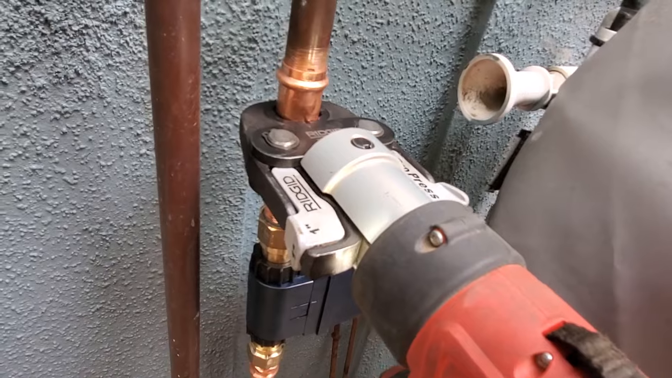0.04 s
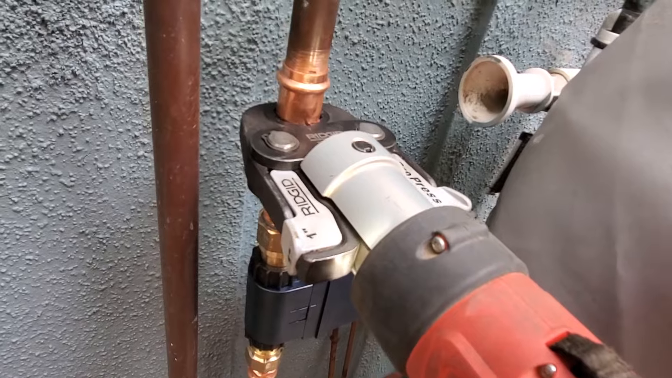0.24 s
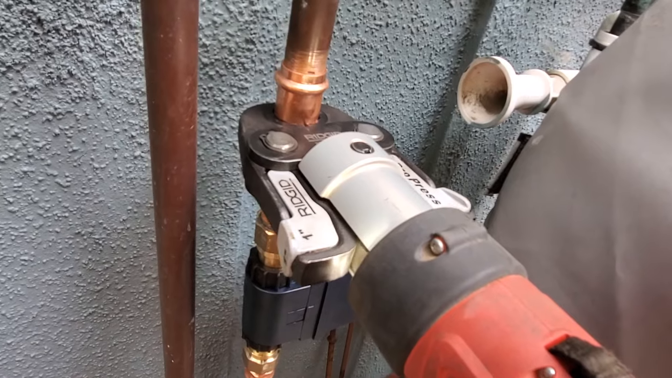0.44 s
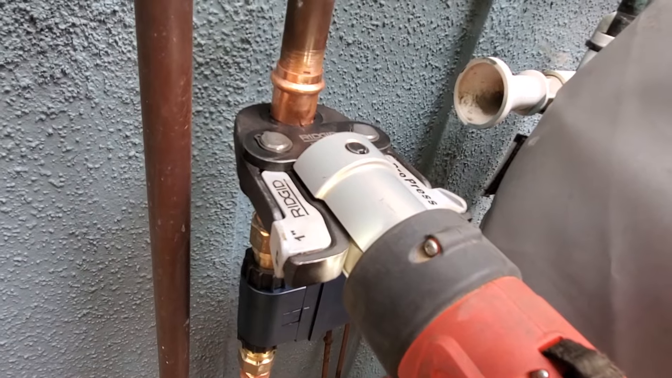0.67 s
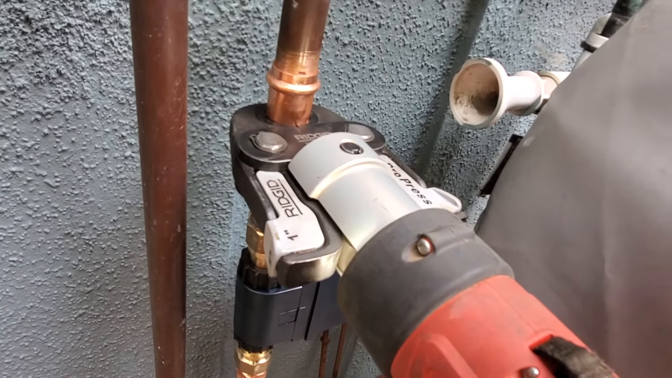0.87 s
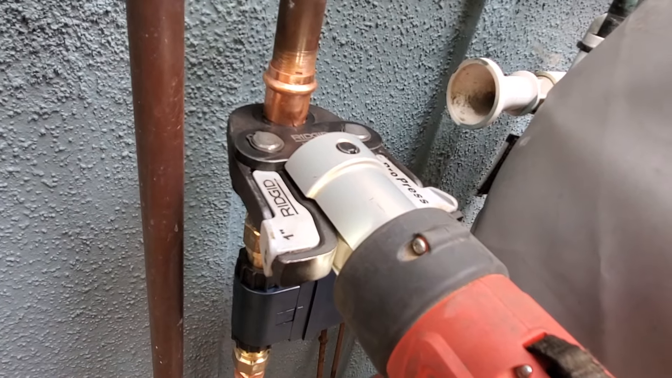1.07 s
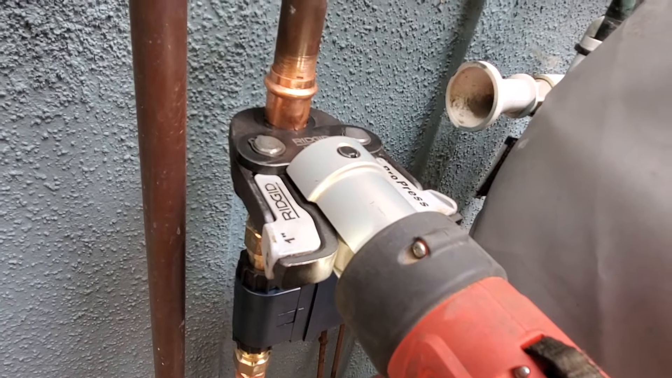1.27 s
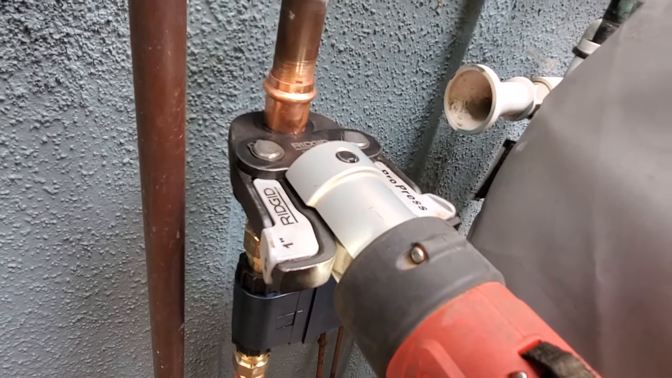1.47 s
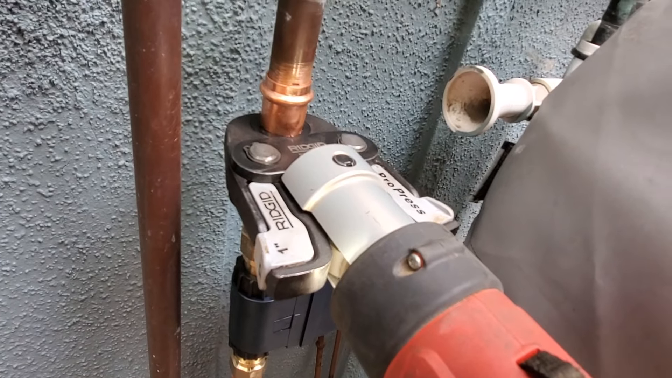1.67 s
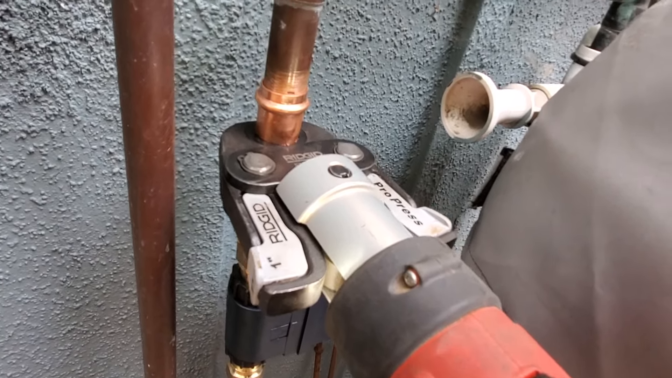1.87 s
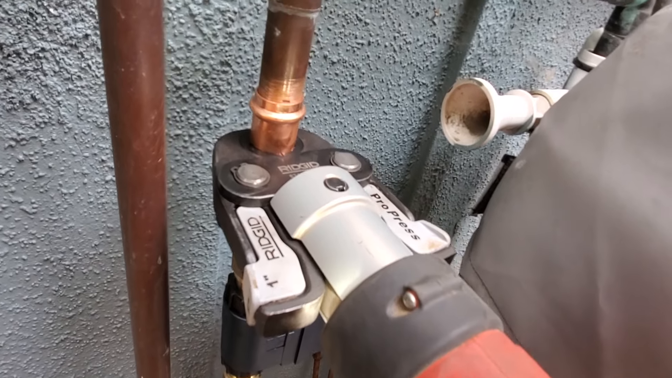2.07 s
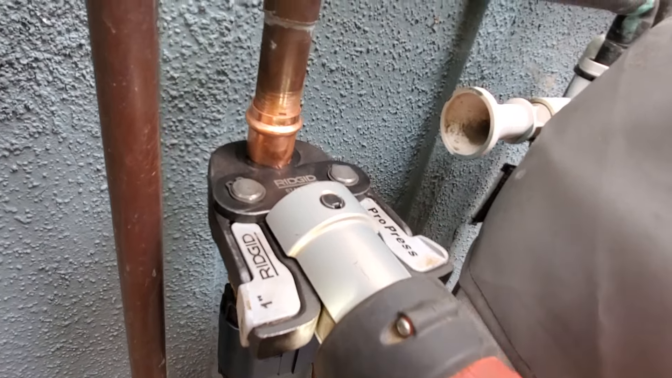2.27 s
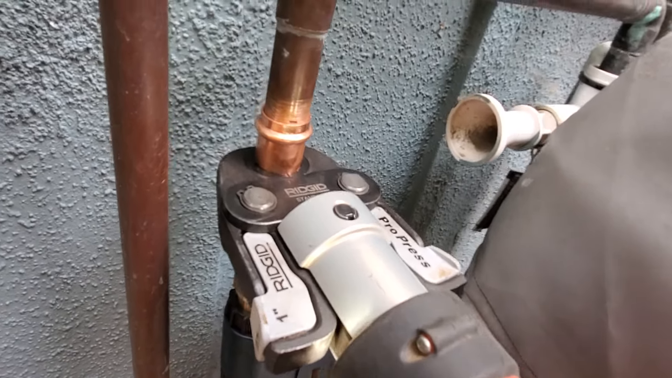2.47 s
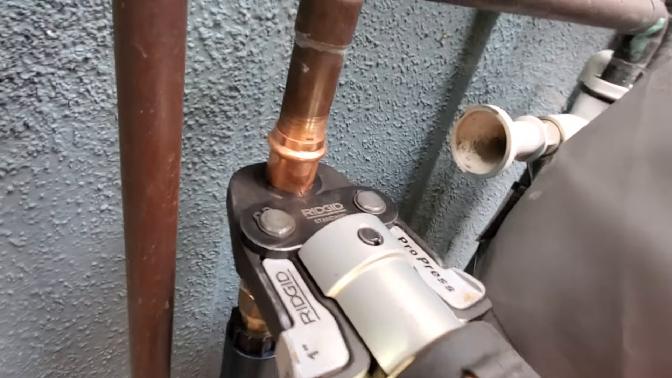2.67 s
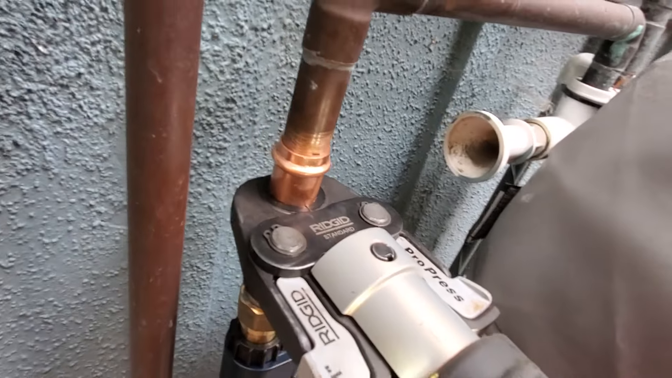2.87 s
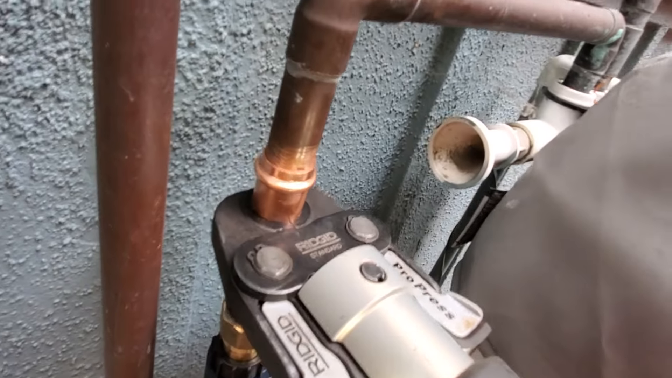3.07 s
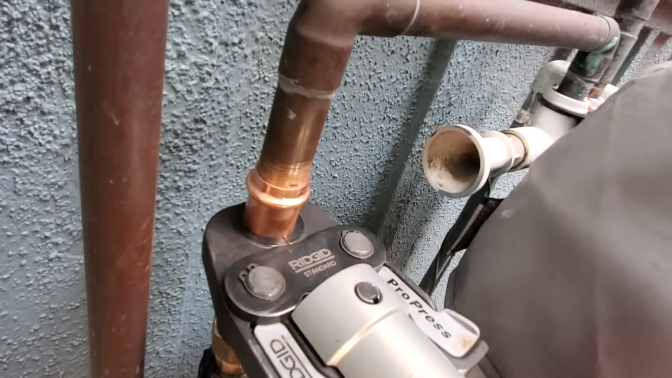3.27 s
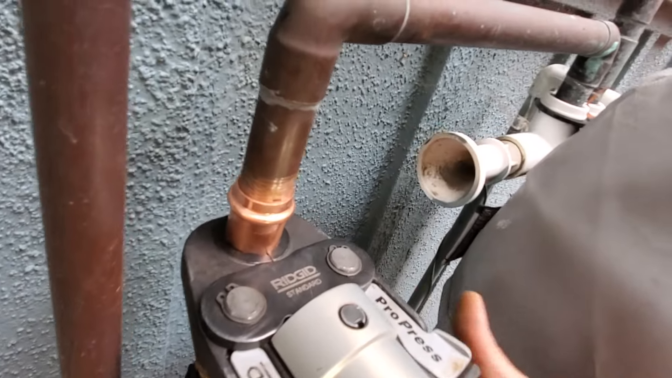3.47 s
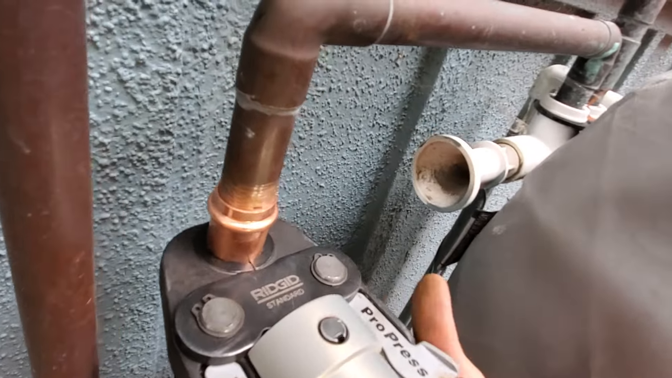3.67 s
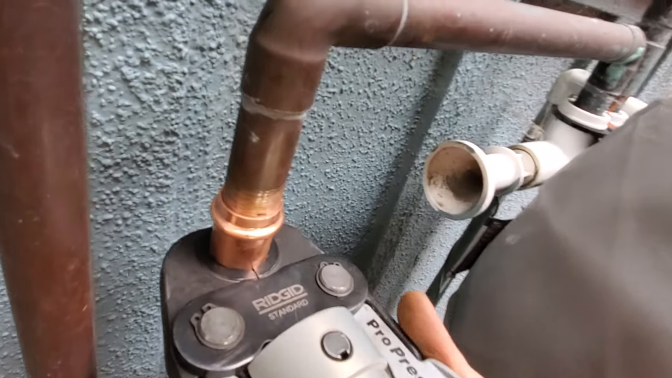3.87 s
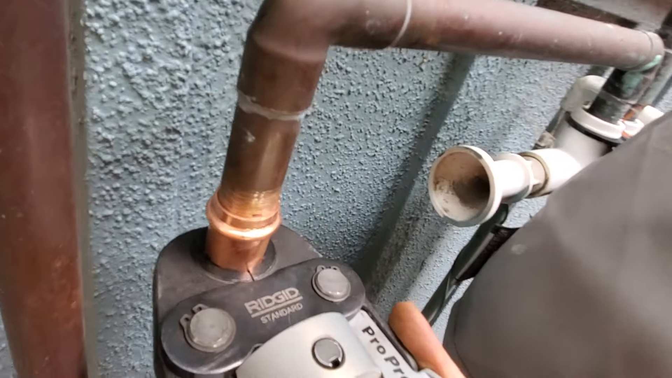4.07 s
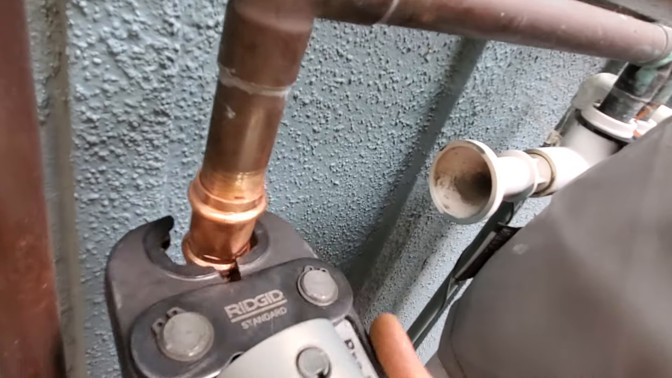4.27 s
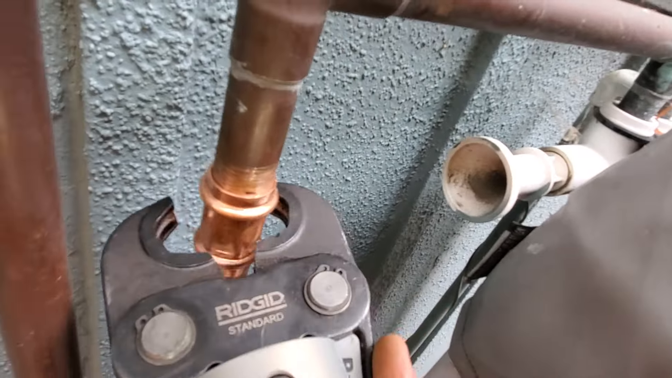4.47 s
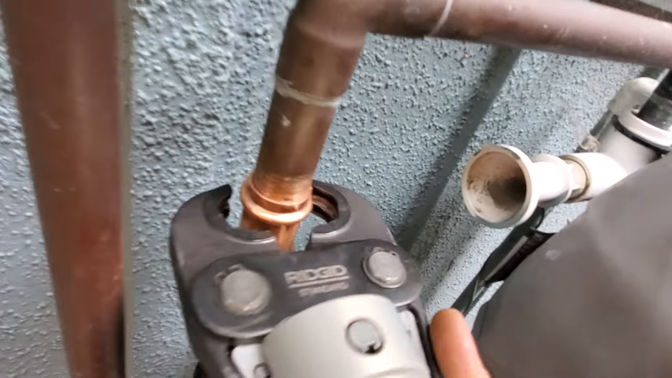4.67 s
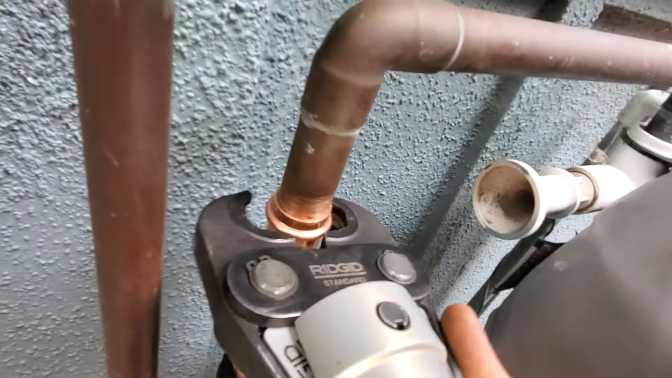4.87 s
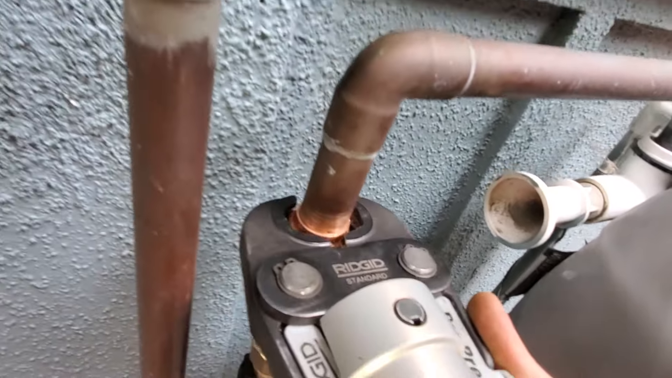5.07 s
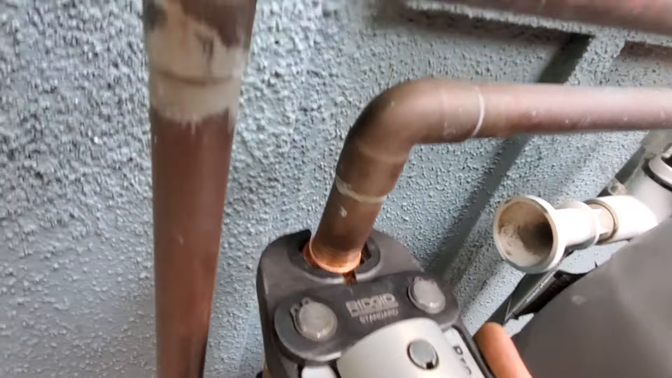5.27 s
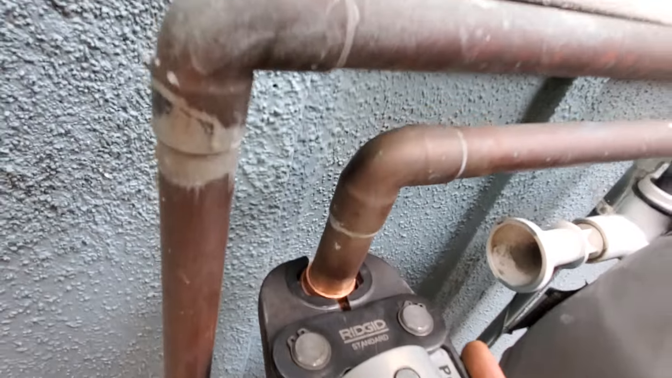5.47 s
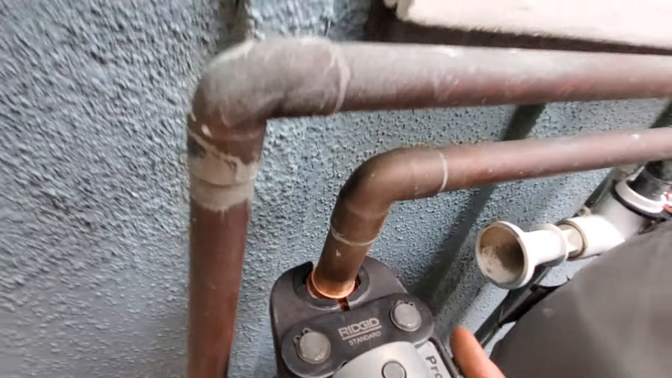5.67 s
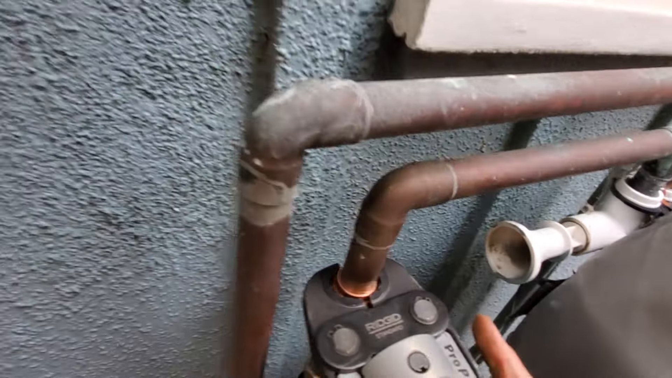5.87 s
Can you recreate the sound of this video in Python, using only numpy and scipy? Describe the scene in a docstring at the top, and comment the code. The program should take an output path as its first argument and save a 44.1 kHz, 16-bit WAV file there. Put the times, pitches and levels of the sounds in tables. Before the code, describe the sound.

A battery press tool whines and rattles close by, labours lower and rougher, pops and stops, then its steel jaws clank open and knock on copper pipe.

```python
"""A motor's whine and gear rattle come first: a battery press tool crimps a copper fitting near the microphones.
The place is a corner between hard walls; a distant machine drones in the building.
The motor drives a piston pump through a 6:1 gear and labours under load until the relief valve pops and it stops.
Then oil whistles back, a hand shifts on the tool, and the sprung steel jaws snap open and knock on the pipe.
Tones and impacts are sums of sines or ringing resonances; hiss, rub and rattle are shaped noise."""
import sys
import numpy as np
from scipy import signal
from scipy.fft import rfft, irfft, next_fast_len
from scipy.io import wavfile
from scipy.ndimage import map_coordinates

SR = 44100
rng = np.random.default_rng(int(sys.argv[2]) if len(sys.argv) > 2 else 0)


def file_out(sig):
    """Save sig as 16-bit WAV at sys.argv[1]."""
    # one column per channel
    cols = np.atleast_2d(sig).T
    # limit, then scale
    lim = np.clip(cols, -1, 1)
    pcm = np.round(lim * 32767).astype(np.int16)
    wavfile.write(sys.argv[1], SR, pcm)


N = 261072
TIME = np.arange(N) / SR


def amp(db):
    """Decibels to gain."""
    return 10 ** (np.asarray(db) / 20)


def unit(x):
    """Scale to rms 1."""
    return x / np.sqrt(np.mean(x ** 2) + 1e-20)


def along(points, hz):
    """Read (frequency, value) points on a log frequency axis."""
    f, v = np.transpose(points)
    return np.interp(np.log(hz + 1), np.log(f + 1), v)


def curves(rows):
    """One value per sample for each column after the time."""
    s, *cols = np.transpose(rows)
    return [np.interp(TIME, s, c) for c in cols]


def wobble(rate):
    """A random curve with rate knots a second."""
    knots = rng.standard_normal(int(N * rate / SR) + 4)
    return map_coordinates(knots, [TIME * rate])


def filtered(x, response):
    """x times a complex response of frequency."""
    n = x.shape[-1]
    m = next_fast_len(n + SR // 2)
    return irfft(rfft(x, m) * response(np.fft.rfftfreq(m, 1 / SR)), m)[..., :n]


def coloured(x, spectrum):
    """x shaped by a spectrum, at rms 1."""
    return unit(filtered(x, lambda hz: amp(along(spectrum, hz))))


def resonate(x, modes):
    """x through a body's resonances, side by side with alternating sign."""
    def body(f):
        total = 0
        for k, (centre, width, db) in enumerate(modes):
            damping = 1j * f * width
            total = total + (-1) ** k * amp(db) * damping / (centre * centre - f * f + damping)
        return total
    return filtered(x, body)


def noise(width, size=N):
    """White stereo noise; width is side over mid."""
    mid, side = rng.standard_normal((2, size))
    return unit(np.array([mid + width * side, mid - width * side]))


def pan(side_db):
    """Left and right gains that differ by side_db."""
    return amp(np.array([[.5], [-.5]]) * side_db)


def fade(start, t60):
    """A sudden start and an exponential decay."""
    return (TIME >= start) * np.exp(-np.log(1000) * np.maximum(TIME - start, 0) / t60)


def swell(middle, half):
    """A smooth rise and fall around a moment."""
    return np.exp(-((TIME - middle) / half) ** 2)


def held(start, length, rise, t60):
    """Exponential attack over 60 dB in rise seconds, hold, and exponential release."""
    attack = np.maximum(start - TIME, 0) / rise
    release = np.maximum(TIME - start - length, 0) / t60
    return np.exp(-np.log(1000) * (attack + release))


def add(track, s, sound):
    """Mix a short sound in at time s."""
    part = track[:, round(s * SR):][:, :sound.shape[-1]]
    part += sound[..., :part.shape[-1]]


# Hard walls close to the tool: (frequency [Hz], t60 [s])
WALLS = [(100, 0.38), (500, .35), (2500, 0.3), (6000, 0.27), (14000, 0.076)]


def room(x, wet_db):
    """x and the answer of the near walls, each frequency dying at its own speed."""
    hz, t, z = signal.stft(rng.standard_normal((2, SR // 2)), SR, nperseg=256)
    decay = np.exp(-np.log(1000) * t / along(WALLS, hz)[:, None])
    tail = signal.istft(z * decay, SR, nperseg=256)[1]
    tail = np.pad(tail / np.linalg.norm(tail[0]), ((0, 0), (SR // 300, 0)))  # first echo after 1/300 s
    return x + amp(wet_db) * signal.fftconvolve(x, tail, axes=1)[:, :N]


# A distant machine heard through the building: (frequency [Hz], width [Hz], level [dB])
DRONE = [(44, 5.7, 0)]


def drone():
    """Twice-resonated noise wavers low, a little stronger as the microphone moves along the wall."""
    level_db = np.interp(TIME, [2.8, 3.6], [-55, -45])
    return amp(level_db) * unit(resonate(resonate(noise(width=0.17), DRONE), DRONE))


# Rumble in the microphone's body: (frequency [Hz], relative level [dB])
RUMBLE = [(20, -18.5), (33, -12), (48, 3), (65, 7), (105, 3.5), (150, -2.5), (250, -8), (500, -48)]
# Sleeve rustle: (frequency [Hz], relative level [dB])
RUSTLE = [(100, -16), (200, -7.5), (300, -5.5), (460, -9.5), (750, -7), (1200, -13.5), (1900, -16.5),
          (3000, -28), (6000, -46.5), (12000, -65.5)]
# Palm sliding on the casing: (frequency [Hz], relative level [dB])
RUB = [(1500, -21), (3500, 1.5), (6000, 1), (9500, -2.5), (12000, 3), (16000, -6)]
# Palm squeak on the casing: (frequency [Hz], relative level [dB])
SQUEAK = [(5800, -4), (7500, 2), (11000, 0), (12000, -3), (14000, -6.5), (15400, 1)]
# Moves of the hand on the tool:
# (middle time [s], palm half length [s], rumble level [dB], sleeve level [dB], palm level [dB])
HAND_MOVES = [(2.119, 0.071, -47, -62, -73), (3.237, 0.063, -41.5, -53.5, -63.5),
              (3.637, 0.084, -44.5, -52.5, -62), (3.899, 0.13, -42.5, -48, -76),
              (4.23, 0.079, -36.5, -45, -51.5), (4.484, 0.12, -38.5, -51, -54),
              (5.049, 0.15, -40, -49, -61), (5.37, 0.07, -44, -45.5, -58), (5.69, 0.24, -43, -49.5, -55.5),
              (5.92, 0.048, -41, -49.5, -68)]
ARM_LINGER = 2.11  # the arm moves this many times as long as the palm slides
REST_RUMBLE_DB, REST_RUSTLE_DB, REST_HISS_DB = -51.5, -56.5, -89  # while the hand is still


def handling():
    """Hand moves rumble in the microphone's body, rustle a sleeve and slide the palm, which squeaks once."""
    rumbling, rustling, sliding = amp(REST_RUMBLE_DB), amp(REST_RUSTLE_DB), amp(REST_HISS_DB)
    for s, half, rumble_db, sleeve_db, palm_db in HAND_MOVES:
        arm = swell(s, ARM_LINGER * half)
        rumbling = np.hypot(rumbling, amp(rumble_db) * arm)
        rustling = np.hypot(rustling, amp(sleeve_db) * arm)
        sliding = np.hypot(sliding, amp(palm_db) * swell(s, half))
    rumble = rumbling * coloured(noise(width=0.11), RUMBLE)
    rustle = rustling * amp(0.83 * wobble(14)) * coloured(noise(width=0.85), RUSTLE)
    rub = sliding * amp(1.2 * wobble(53)) * coloured(noise(width=1.0), RUB)
    squeak_modes = [(hz, 130, db) for hz, db in SQUEAK]  # each 130 Hz wide
    squeak = unit(resonate(noise(width=0.93), squeak_modes))
    squeak = amp(-63.0) * squeak * held(2.99, length=0.033, rise=.015, t60=.3)
    return (rumble + rustle + rub + squeak) * pan(-1.7)


# Oil whistling and hissing back through the valve as the ram retracts: (middle time [s], half length [s],
# level [dB], pitch at the middle [Hz], glide [octaves/s], flutter rate [knots/s])
WHISTLES = [(2.3, .2, -75.5, 6500, -1.2, 5500), (2.46, .06, -80.5, 10500, -1.0, 300),
            (2.48, .03, -75, 11900, -1.8, 300), (2.62, .035, -66, 4500, -1.5, 400),
            (2.63, 0.1, -70, 4800, -1.5, 1990), (2.698, 0.14, -70.5, 3510, -0.5, 450)]


def oil_return():
    """Thin whistles, broadened by random flutter, sink in pitch as the pressure drains."""
    out = np.zeros((2, N))
    for s, half, db, hz, glide, flutter_rate in WHISTLES:
        pitch = hz * 2 ** (glide * (TIME - s))
        tone = np.sin(2 * np.pi * np.cumsum(pitch) / SR)
        whistle = tone * np.array([wobble(flutter_rate), wobble(flutter_rate)])
        out += amp(db) * swell(s, half) * unit(whistle)
    return out


# The copper pipe's resonances: (frequency [Hz], width [Hz], level [dB])
COPPER = [(748, 220, -2), (1597, 230, -4.5), (2466, 150, 2), (3740, 580, -13.5), (4600, 550, -14),
          (7200, 900, -26)]
# The open jaws scraping along the copper: (start time [s], length [s], level [dB], t60 [s])
SCRAPES = [(4.34, 0.03, -42.5, .03), (4.953, .005, -40, .03), (5.336, 0.17, -47, 0.97)]
SCRAPE_RISE_S = 0.058  # for a rise of 60 dB


def scrape():
    """Steel slips over the pipe in small uneven catches: wavering noise excites the copper."""
    grit = noise(width=0.99) * amp(1.6 * wobble(250))
    pressure = sum(amp(db) * held(s, length, SCRAPE_RISE_S, t60) for s, length, db, t60 in SCRAPES)
    return pressure * unit(resonate(grit, COPPER))


# The ram clicking as it unloads and draws back: (time [s], blow strength [dB])
RAM_CLICKS = [(2.038, 9.5), (2.2344, -1.5), (2.238, -4)]
# The ram and its rollers: (frequency [Hz], width [Hz], level [dB])
RAM = [(1038, 45, 2), (1640, 82, -3.5), (2700, 160, -6), (3260, 120, -9), (4100, 200, -15.5)]


def ram():
    """The steel ram gives short, hollow clicks as the pressure leaves it."""
    blows = np.zeros((2, N))
    for s, db in RAM_CLICKS:
        add(blows, s, amp([db]))
    return room(resonate(blows, RAM), wet_db=-10.5)


# The jaw spring's resonances: (frequency [Hz], width [Hz], level [dB])
COIL = [(1840, 260, -9), (2600, 500, -9), (6530, 130, 3), (7900, 350, -6.5), (12800, 550, -7)]
SPRING_S, SPRING_DB, SPRING_HOLD_S, SPRING_T60_S = 4.383, -25, 0.028, 0.26


def spring():
    """The jaw spring buzzes against the steel as the jaws let go of the fitting."""
    chatter = unit(resonate(noise(width=0.89), COIL))
    shape = held(SPRING_S, SPRING_HOLD_S, rise=.015, t60=SPRING_T60_S)
    return amp(SPRING_DB + 1.4 * wobble(380)) * chatter * shape


def burst(spectrum, width, t60):
    """Coloured noise that starts at once and dies away."""
    t = TIME[:SR // 2]
    return coloured(noise(width, size=len(t)), spectrum) * np.exp(-np.log(1000) * t / t60)


def struck(modes, scatter_db, detune):
    """One blow on a body's modes; grip and point of contact shift their levels and pitches every time."""
    t = TIME[:SR // 2]
    out = 0
    for k, (hz, db, t60) in enumerate(modes):
        level_db = db + rng.normal(0, scatter_db) + rng.normal(0, 1, (2, 1))
        pitch = hz * (1 + detune * rng.normal())
        out = out + amp(level_db - 60 * t / t60) * np.sin(2 * np.pi * pitch * t) * (-1) ** k
    return out


# Contacts of ram, jaws and pipe, with levels before the trims in knocks(): (time [s], pipe thud [dB],
# clack [dB], jaw plate knock [dB], tick [dB], treble slope [dB/octave], left over right [dB],
# steel ring [dB], frequency around which the jaws ring [Hz])
KNOCKS = [(2.234, -56, -42, -56, -51, -7, -3, -68, 2400),
          (2.531, -49, -48.5, -51, -55.5, -3, -9, -74.5, 3800),
          (4.134, -39.5, -31.5, -37, -45, 1, -3, -69, 3800),
          (4.140, -51.5, -53, -55, -40.5, 6, -2, -71, 13000),
          (4.342, -39.5, -34.5, -40, -45, -6, -4, -74.5, 2400),
          (4.363, -42, -30, -40, -42, -4, -1.5, -75, 2410),
          (4.3754, -47, -16, -6.5, -13, 0.5, 0, -46, 7000),
          (4.400, -26.5, -30, -40, -23, -1, -1, -52, 6600),
          (4.5437, -31, -19, -16, -17, -8, -2.5, -49.5, 4170),
          (4.783, -41, -38.5, -51, -56, -9, -2.5, -74, 3000),
          (4.875, -37.5, -46, -51, -59, -6, -3, -76, 3000),
          (4.957, -24, -16.5, -10.5, -28, -4, -2, -41.5, 2450),
          (4.973, -29, -24, -22, -29, -3, -5, -52, 6300),
          (5.139, -27.5, -23, -30, -31, -5.5, -4.5, -53, 8500),
          (5.148, -36, -30, -42, -40.5, -5, -3, -62, 3000), (5.27, -35, -30.5, -34, -45, -6, -2, -57, 2400),
          (5.304, -35.5, -30, -36, -46, 0, -5, -60, 2400), (5.341, -43.5, -44, -44, -54, -5, -6, -56, 2400)]
# Dull crack of a contact: (frequency [Hz], relative level [dB])
CLACK = [(200, -16), (700, -1), (1100, -5), (1650, -0.5), (2050, -9), (2500, -5.5), (3500, -11),
         (5000, -17), (9000, -31.5)]
# Bright tick of a contact: (frequency [Hz], relative level [dB])
TICK = [(1000, -31.5), (3500, -11), (5500, -5.5), (6700, 4.5), (7400, -5.5), (8200, 0), (9700, -14),
        (11500, -11.5), (13000, 2.5), (14200, -16.5), (16000, -16)]
# Jaw plates hit squarely, before scatter: (frequency [Hz], level [dB], t60 [s])
PLATES = [(1608.7, -0.5, 0.027), (1835, -2.5, 0.017), (2394, -6.5, 0.022), (2810, -9, .018),
          (3510, -6, .018), (4630, -8, 0.0084)]
# Ringing steel jaws, before scatter: (frequency [Hz], level [dB], t60 [s])
STEEL = [(2366, -3, 0.66), (2966, -4, 0.8), (3811, 3.5, 0.46), (5932, -17, .7), (6200, -12, 0.49),
         (6460, -6.5, .35), (7300, -6.5, .45), (8040, -9, 0.43), (12490, -15, 0.2), (13720, -5.5, .16)]
# Bending modes of the pipe run, before scatter: (frequency [Hz], level [dB], t60 [s])
PIPE = [(106.5, -7.5, .45), (148.1, -5, 0.42), (191, -1, 0.35), (226, -1.5, 0.28), (262, -3.5, 0.24),
        (333, -4, 0.14), (425, -3, .15), (501, -3, 0.14), (728, -6, 0.12), (1050, -11, 0.082)]
# The pipe rattling in its brackets: (frequency [Hz], relative level [dB])
BRACKETS = [(60, -12.5), (190, 1), (450, 1), (700, -7.5), (1500, -14), (4000, -42)]
DULL_HZ = 6650  # the treble slope starts here: a softer contact loses treble above this


def knocks():
    """Contacts crack, knock the jaw plates, ring the steel and send a bending wave down the pipe."""
    cracks, thuds, t = np.zeros((2, N)), np.zeros((2, N)), TIME[:SR]
    for s, thud_db, clack_db, plate_db, tick_db, slope_db, side_db, ring_db, ring_hz in KNOCKS:
        crack = amp(clack_db + 2.5) * burst(CLACK, width=0.95, t60=0.027)
        crack = crack + amp(tick_db + 3.0) * burst(TICK, width=1.0, t60=0.02)
        crack = crack + amp(plate_db - 6) * struck(PLATES, scatter_db=3.5, detune=.015)
        crack = filtered(crack, lambda hz: amp(slope_db * np.log2(np.maximum(hz / DULL_HZ, 1))))
        ring = 0
        for hz, db, t60 in STEEL:
            # the point of contact decides which modes speak
            reach_db = -28 * abs(np.log2(hz / ring_hz))
            level_db = db + rng.normal(0, 1.5, (2, 1)) + reach_db
            ring = ring + amp(level_db - 60 * t / t60) * np.sin(2 * np.pi * (hz * t + rng.random()))
        thud = amp(thud_db - 5.5) * struck(PIPE, scatter_db=2.5, detune=0.041)
        thud = thud + amp(thud_db - 3.0) * burst(BRACKETS, width=.35, t60=.22)
        add(cracks, s, crack * pan(side_db))
        add(cracks, s, amp(ring_db + 1.5) * ring)
        add(thuds, s, thud)
    # low bending waves travel slowest, so the thud sinks in pitch
    thuds = filtered(thuds, lambda hz: np.exp(-2j * np.pi * 0.22 * np.sqrt(hz)))
    return room(cracks, wet_db=-12.0) + thuds


STOP = 1.962  # the relief valve opens [s]
# The valve's pop: (frequency [Hz], width [Hz], level [dB])
VALVE = [(195, 80, -10), (340, 45, 0), (476, 90, -8), (1265, 190, -4), (1560, 70, -11)]


def valve():
    """The relief valve dumps the oil pressure in one blow, with a short spit."""
    blow = np.zeros((2, N))
    add(blow, STOP - .001, amp([32]))
    rush = amp(1.5) * noise(width=.6) * fade(STOP, t60=0.054)
    trail = amp(-8) * noise(width=.6) * fade(STOP, t60=0.22)
    pop = resonate(blow + rush + trail, VALVE)
    spit = amp(-20.0) * noise(width=0.59) * fade(STOP, t60=0.029)
    return room(pop + spit, wet_db=-10.5)


def lobe(turns, centre, sharp):
    """A smooth bump once a turn."""
    return np.exp(sharp * (np.cos(2 * np.pi * (turns - centre)) - 1))


def teeth(turns, width, count=300, size=8192):
    """The gear teeth's random flaws, met again at every turn of the pump shaft."""
    flaws = irfft(np.exp(2j * np.pi * rng.random((2, count))), size)
    mid, side = [np.interp(turns, np.arange(size) / size, f, period=1) for f in flaws]
    return unit(np.array([mid + width * side, mid - width * side]))


def tones(cycles, orders, levels):
    """Shaft overtones; each swells and fades on its own as the tool sways before the two microphones."""
    out = 0
    for k, db in zip(orders, levels):
        level = amp(db + 1.3 * wobble(8)) * np.sqrt(2)
        phase = 2 * np.pi * (round(k) * cycles + rng.random()) + rng.normal(0, 0.57, (2, 1))
        out = out + level * np.sin(phase)
    return out


# Pump shaft, slowed by the oil pressure: (time [s], speed [strokes/s])
PUMP = [(0.0, 55.52), (0.35, 55.42), (0.46, 54.75), (0.58, 54.33), (0.7, 54.1), (0.8, 53.6), (0.88, 53.45),
        (0.99, 53.82), (1.06, 53.46), (1.18, 52.84), (1.42, 51.23), (1.65, 49.52), (1.78, 47.05),
        (1.9, 44.62), (1.97, 48)]
# The whine drifting across the two microphones as the tool shifts:
# (time [s], left over right [dB], left lead [rad], level change [dB])
WHINE_SIDE = [(.05, 0.5, -2.5, 1), (0.16, 0.5, -3, -1), (0.31, 5.5, -3.5, -3.5), (.43, 7.5, -2, -1),
              (0.6, 8, -1.5, -1.1), (.77, 8.5, 0.4, -1), (1.08, 10, 1.1, 0), (1.45, 3.5, -.7, 0)]
# Motor overtones before the load swing:
# (multiple of motor speed, level running free [dB], level under load [dB])
BUZZ = [(2, -41.5, -54), (5, -41.5, -49), (6, -30, -43), (7, -28.5, -42.5), (9, -26.8, -38.5),
        (10, -37.5, -47), (11, -33, -39), (12, -39.5, -38.5), (15, -39, -48), (16, -37.5, -43),
        (17, -37.5, -41), (22, -46.5, -53.5), (23, -44.5, -46.5)]
# The loaded gear's growl passing from one tooth order to the next, before the stroke swing:
# (multiple of pump rate, gripping [dB], squeezing [dB], crushing [dB])
GROWL = [(27, -46, -42.5, -39.5), (33, -47.5, -40, -27.5), (36, -37, -30, -35.5), (43, -39.5, -37.5, -45),
         (56, -39.5, -43, -43), (66, -37, -45.5, -45.5)]
# Gear squeal at every pressure stroke, before the stroke swing; multiples are rounded to whole numbers:
# (multiple of pump rate, gripping [dB], squeezing [dB], crushing [dB])
SQUEAL = [(84, -47.5, -45.5, -50), (99.9, -30, -33, -49.5), (122, -47, -39.5, -44),
          (137.2, -38.5, -43.5, -34.5)]
# Gearbox housing: (frequency [Hz], relative level [dB])
HOUSING = [(30, -37), (110, -15.5), (220, -11), (450, -7), (750, -10.5), (1100, -7), (1600, 0), (2100, -1),
           (3600, -0.5), (5400, -5.5), (7000, -8.5), (9400, -12.5), (11300, -8), (13800, -13.5),
           (15500, -14)]
# Oil squeezed through the pump's valves: (frequency [Hz], relative level [dB])
FIZZ = [(4000, -29), (6800, -1.5), (9400, -12), (11000, 2), (13800, -5.5), (15500, -2.5)]
# Pump block: (frequency [Hz], width [Hz], relative level [dB])
BLOCK = [(740, 210, -3), (1000, 150, -7), (1504, 120, 4), (1600, 130, 4)]
# Parts of the drive, before any swing within the stroke:
# (running free [dB], gripping [dB], crushing the copper [dB])
HUM_DB = (-36.5, -43.5, -51.5)
WHINE_DB = (-16.8, -20.5, -28.5)
RATTLE_DB = (-24, -22.5, -22)
KNOCK_DB = (-49.5, -31.5, -33.5)
FIZZ_DB = (-53.5, -40.5, -33)
GEAR_RATIO, MESH_ORDER = 6, 8  # motor turns per pump turn, whine cycles per motor turn
# share of its speed that the pump has lost once the jaws grip, and once the copper starts to give
GRIP_SLOWING, SQUEEZE_SLOWING = 0.03, .08
# swing of the squeal's phase over a stroke, and its unsteadiness before load scales it [turns]
SQUEAL_GLIDE, SQUEAL_ROUGH = 0.0084, .0036


def drive():
    """Motor, gears and pump: oil pressure slows the shaft, most in the pressure stroke, and sets the levels."""
    speed, = curves(PUMP)
    turns = np.cumsum(speed) / SR
    slowing = 1 - speed / speed.max()

    def staged(levels):
        """Level from running free, through gripping, to crushing."""
        return np.interp(slowing, [0, GRIP_SLOWING, slowing.max()], levels)

    def pressed(levels):
        """Level from gripping, through squeezing, to crushing."""
        return np.interp(slowing, [GRIP_SLOWING, SQUEEZE_SLOWING, slowing.max()], levels)

    load = np.sqrt(slowing)
    gripping = np.minimum(load / 0.25, 1)  # the jaws have met the fitting
    straining = slowing / slowing.max()  # the copper is being crushed
    pressing = lobe(turns, centre=0.64, sharp=2.0)

    # the shaft races on the suction stroke and drags on the pressure stroke, which gives each line sidebands
    stroke_swing = (0.00054 + .024 * load) * np.sin(2 * np.pi * (turns - .36))
    unsteadiness = (0.001 * load + .0012 * straining ** 2) * wobble(110)
    angle = turns + stroke_swing + unsteadiness
    motor = GEAR_RATIO * angle

    hum = amp(staged(HUM_DB)) * unit(np.sin(2 * np.pi * motor)) * pan(5.5)
    throb = np.sin(2 * np.pi * turns) + (.5 + straining) * np.sin(4 * np.pi * turns)
    throb = amp(-42.5 - 14 * straining) * unit(throb)

    side_db, lead, sway_db = curves(WHINE_SIDE)
    mesh_phase = 2 * np.pi * MESH_ORDER * motor + np.array([lead, -lead]) / 2
    mesh = unit(np.sin(mesh_phase)) * pan(side_db)
    waver_db = .5 * wobble(16) + 4.6 * load * wobble(300)
    stroke_dip_db = 23 * load * (lobe(turns, centre=.85, sharp=0.94) - 0.25)
    whine = amp(staged(WHINE_DB) + sway_db + waver_db - stroke_dip_db) * mesh

    buzz_levels = [free + (loaded - free) * gripping for _, free, loaded in BUZZ]
    buzz = tones(motor, [k for k, *_ in BUZZ], buzz_levels)
    buzz_swing_db = (10 * gripping + 6 * load) * (pressing - .5) - 4.6 * straining - 1.7
    buzz = buzz * amp(buzz_swing_db) * pan(-4.5 - 5 * gripping)

    growl_turns = turns + 0.006 * np.sin(2 * np.pi * (turns - .52)) + .0025 * load * wobble(120)
    growl = tones(growl_turns, [k for k, *_ in GROWL], [pressed(levels) for _, *levels in GROWL])
    growl = gripping ** 2 * growl * unit(lobe(turns, centre=0.76, sharp=0.76)) * pan(-2.5)

    # loaded teeth grind: partly the same at every turn, partly at random
    chance = 0.8 + .4 * load
    grind = (teeth(angle, width=0.96) + chance * noise(width=.8)) / np.hypot(1, chance)
    rattle_swing_db = 10 * load * (pressing - 0.53) + 5.9 * (lobe(motor, centre=.5, sharp=1.5) - 0.38)
    rattle = amp(staged(RATTLE_DB)) * coloured(grind, HOUSING) * amp(rattle_swing_db) * pan(-2.1)

    surge = amp((1.5 + 20 * load) * (pressing - 0.1))
    fizz = amp(staged(FIZZ_DB)) * coloured(noise(width=0.77), FIZZ) * surge * pan(2.5)

    # each squeal is a short chirp that falls as the stroke stiffens
    roughness = SQUEAL_ROUGH * (load + .5 * straining) * wobble(330)
    chirp = turns + SQUEAL_GLIDE * np.sin(2 * np.pi * (turns - .58)) + roughness
    squeal = tones(chirp, [k for k, *_ in SQUEAL], [pressed(levels) for _, *levels in SQUEAL])
    squeal_shape = unit(lobe(turns, centre=.66, sharp=2.1) * amp(.8 * wobble(50)))
    squeal = gripping ** 2 * squeal * squeal_shape * pan(-2.1)

    # the piston knocks on the block at the end of each stroke
    strokes = np.diff(np.floor(turns - .9), prepend=-1) * amp(.9 * wobble(50))
    blows = unit(strokes) + 0.16 * unit(noise(width=0.39) * lobe(turns, centre=.9, sharp=9))
    knock = amp(staged(KNOCK_DB)) * unit(resonate(blows, BLOCK))

    # the check valve clicks shut
    click = amp(-33.0 + 30 * load) * coloured(noise(width=0.59), HOUSING)
    click = click * lobe(turns, centre=.94, sharp=26)

    # the gears die away as soon as the load is gone; the pump coasts a little longer
    driven = np.maximum(TIME < STOP + .02, fade(STOP + .02, t60=0.065))
    coasting = np.maximum(TIME < STOP + .018, fade(STOP + .015, t60=.15))
    tonal = driven * (hum + throb + whine + buzz + growl + squeal + knock)
    noisy = coasting * (rattle + fizz + click)
    return room(tonal, wet_db=-13.5) + room(noisy, wet_db=-8.0)


def scene():
    """The building, the hand that holds the tool, and the tool itself."""
    background = drone() + handling()
    release = oil_return() + scrape() + ram() + spring() + knocks()
    return background + release + valve() + drive()


TOP_HZ = 16150  # middle of the 400 Hz wide upper band edge


def record(dry):
    """The recorder keeps nothing above its band limit."""
    return filtered(dry, lambda hz: np.clip((TOP_HZ - hz) / 400 + .5, 0, 1))


dry = scene()
out = record(dry)
file_out(out)
```